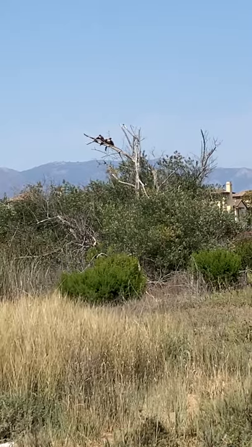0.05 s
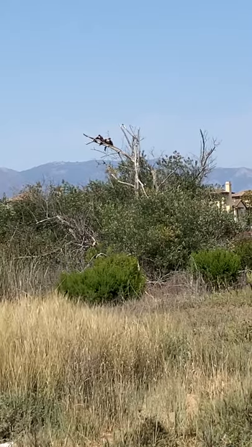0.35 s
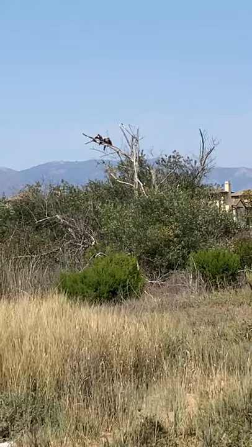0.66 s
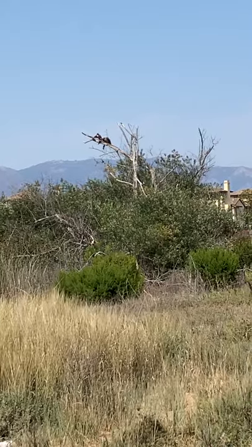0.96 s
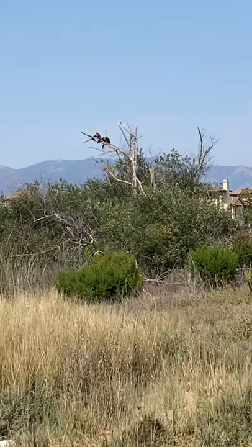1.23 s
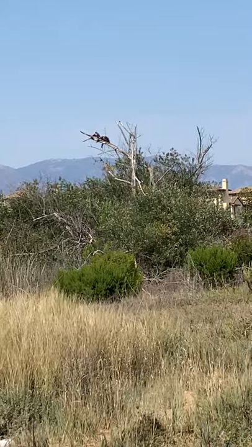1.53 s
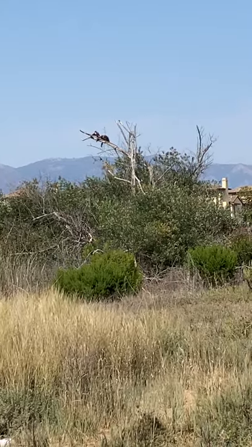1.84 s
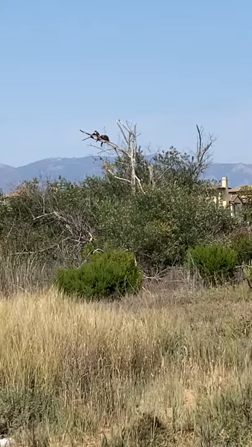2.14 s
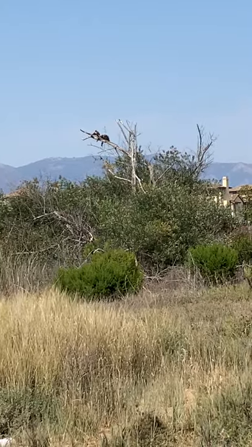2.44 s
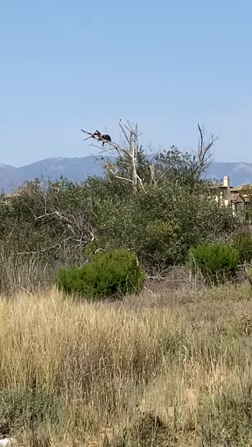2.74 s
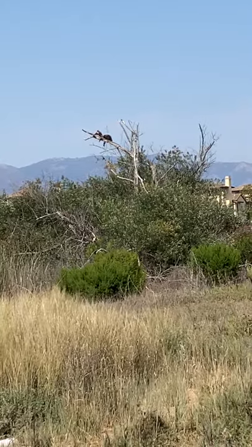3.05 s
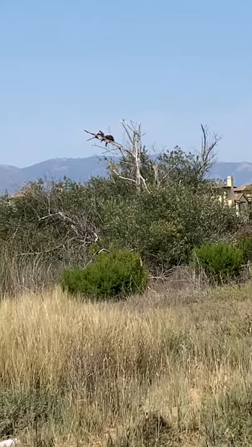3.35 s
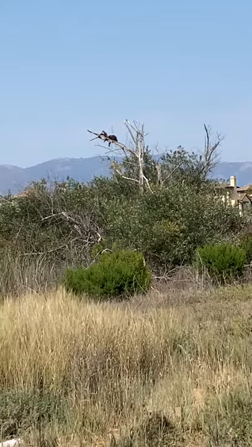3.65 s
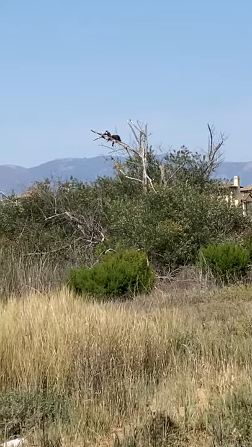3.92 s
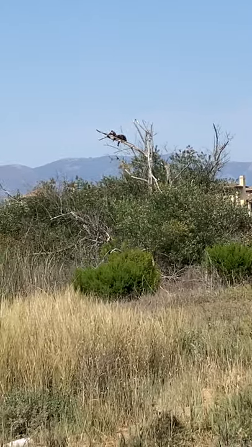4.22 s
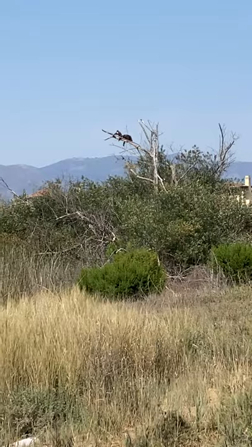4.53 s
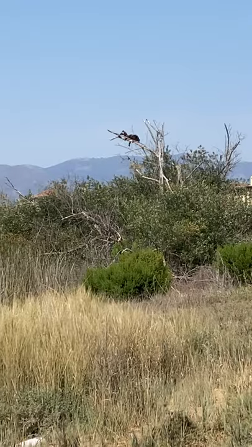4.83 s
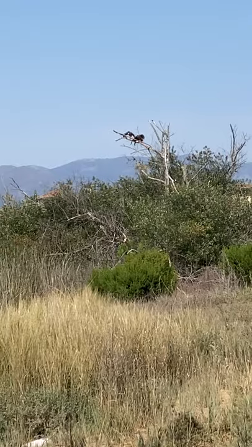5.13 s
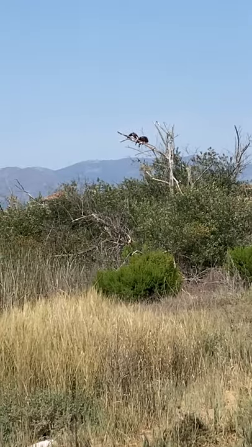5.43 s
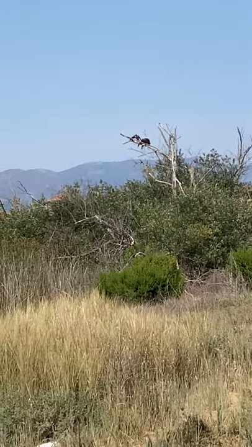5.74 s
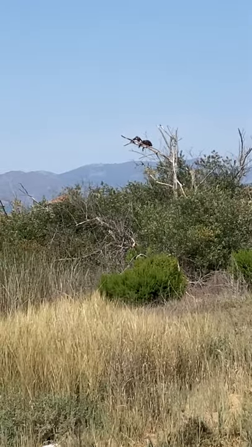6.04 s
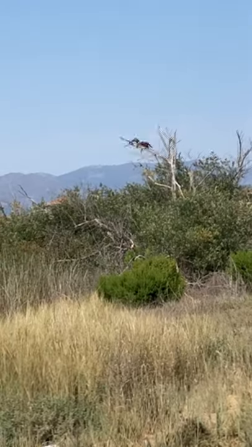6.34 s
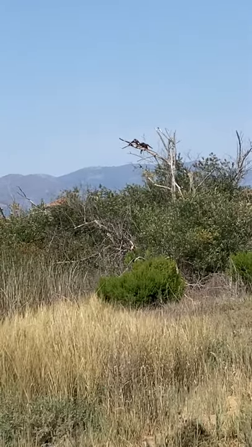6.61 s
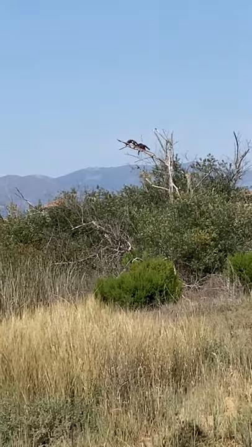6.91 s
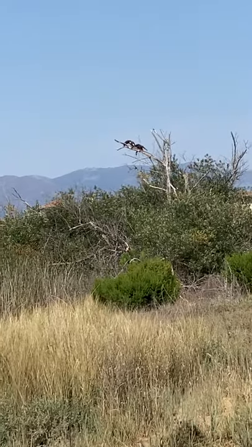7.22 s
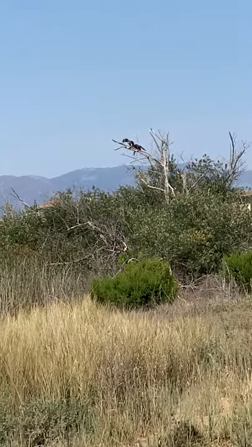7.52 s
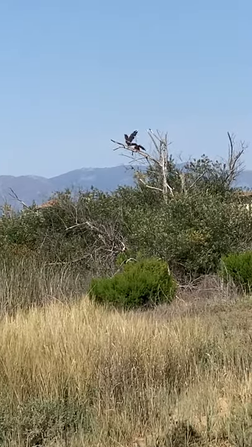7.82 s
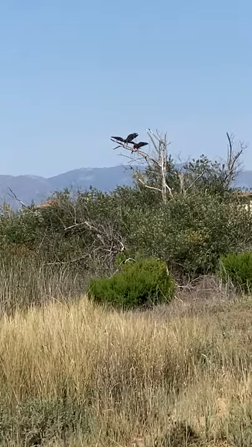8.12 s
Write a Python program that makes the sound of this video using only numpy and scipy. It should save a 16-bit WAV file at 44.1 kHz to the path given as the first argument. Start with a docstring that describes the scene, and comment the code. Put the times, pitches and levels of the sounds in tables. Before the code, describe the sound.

Two hawks trade high whistles, squeals and hoarse yelps over low wind rumble and a distant passing vehicle.

```python
"""Two hawks over open grassland

Two hawks cry from a dead tree. One gives clean rising whistles that drop sharply; the other sounds both
sides of its syrinx in a squeal that breaks into a low, hoarse yelp. Short peeps fall between, and scrub
scatters the cries. Behind them grass hisses, a far vehicle drones past and gusts buffet the microphone."""
import sys
import numpy as np
from scipy import signal
from scipy.fft import rfft, irfft
from scipy.io import wavfile

SR = 44100
rng = np.random.default_rng(int(sys.argv[2]) if len(sys.argv) > 2 else 0)


def file_out(sig):
    """Save sig as 16-bit WAV at sys.argv[1]."""
    # one column per channel
    cols = np.atleast_2d(sig).T
    # limit, then scale
    lim = np.clip(cols, -1, 1)
    pcm = np.round(lim * 32767).astype(np.int16)
    wavfile.write(sys.argv[1], SR, pcm)


N = 360297
T, HZ = np.arange(N) / SR, np.fft.rfftfreq(N, 1 / SR)
SLACK_HZ = 3500  # pitch of the relaxed syrinx


def gain_of(db):
    return 10 ** (np.asarray(db) / 20)


def unit_rms(x):
    return x / np.sqrt(np.mean(x ** 2) + 1e-20)


def over_frequency(table, column=1):
    """Interpolation of one column over the spectrum, on a log-frequency axis."""
    columns = np.transpose(table)
    return np.interp(np.log(HZ + 1), np.log(columns[0] + 1), columns[column])


def over_time(table):
    """Linear interpolation of each column over the scene."""
    times, *columns = np.transpose(table)
    return [np.interp(T, times, column) for column in columns]


def add(mix, start_s, sound):
    part = mix[max(round(start_s * SR), 0):][:len(sound)]
    part += sound[:len(part)]


def wobble(t, hz):
    """Random modulation: noise of rms 1, band-limited to hz."""
    spectrum = rng.standard_normal(1025) + 1j * rng.standard_normal(1025)
    path = unit_rms(irfft(spectrum * (np.arange(1025) < 256)))
    return np.interp((t - t[0]) * hz / 256, np.arange(2048) / 2048, path, period=1)


def coloured_noise(colour):
    """Spectral shaping: white noise weighted by a gain at each frequency."""
    return unit_rms(irfft(rfft(rng.standard_normal(N)) * colour, N))


# Likeness of diffuse sound at the two microphone ports: frequency_hz, coherence
COHERENCE = [(30, 1), (120, 0.94), (300, 0.38), (1000, 0.14), (3000, 0.13), (12000, 0.16)]


def diffuse(colour):
    """Spatial coherence: a diffuse field is alike at both ports only at long wavelengths."""
    left, independent = rfft(rng.standard_normal((2, N)))
    coherence = over_frequency(COHERENCE)
    right = coherence * left + np.sqrt(1 - coherence ** 2) * independent
    return unit_rms(irfft(np.array([left, right]) * colour, N))


# Microphone response toward the tree: frequency_hz, left_lead_rad, left_minus_right_db
PORT_RESPONSE = [(1520, 3.1, -3), (2040, 1.43, -4.5), (2300, 2.5, -0.5), (2744, 1.8, 3.5),
                 (2930, 2.84, -7.5), (4100, 1.48, 1.2), (4550, 1.64, -.5), (4820, 2.08, -4),
                 (5526, 3.18, 2), (8940, 6.29, -1), (15820, 13.15, 1)]


def from_ahead(x):
    """Directional response: sound from the tree meets the two ports at different phases and levels."""
    lead, balance = over_frequency(PORT_RESPONSE), gain_of(over_frequency(PORT_RESPONSE, column=2))
    ports = np.array([balance * np.exp(1j * lead), np.ones(len(HZ))]) * np.sqrt(2 / (1 + balance ** 2))
    return irfft(rfft(x) * ports, N)


# Hiss spectrum of air and dry grass: frequency_hz, relative_db
GRASS_SPECTRUM = [(1000, 5), (6000, -4), (9000, -3.5), (12000, -9.5), (15500, -9.5)]
# Dry ticks close by: start_s, unfiltered_level_db
DRY_TICKS = [(2.795, -52), (7.942, -67)]


def grass(ahead_db=-80, around_db=-88, decay_s=0.003, highpass_hz=5000):
    """Broadband noise: a faint hiss, mostly from ahead, with ticks that decay exponentially."""
    colour = gain_of(over_frequency(GRASS_SPECTRUM))
    hiss = gain_of(ahead_db) * coloured_noise(colour)
    ticks, t = np.zeros(N), np.arange(1024) / SR
    for start_s, db in DRY_TICKS:
        add(ticks, start_s, gain_of(db) * np.exp(-t / decay_s) * rng.standard_normal(len(t)))
    ticks = signal.sosfilt(signal.butter(2, highpass_hz, "high", fs=SR, output="sos"), ticks)
    return from_ahead(hiss + ticks) + gain_of(around_db) * diffuse(colour)


# Tyre roar as the vehicle passes: time_s, level_db
ROAR_LEVEL = [(0, -62.5), (1.3, -68), (3.3, -65), (4.1, -63.5), (4.7, -60.5), (5.3, -60.5), (6.1, -66.5),
              (8.17, -65)]
# Spectrum of the roar: frequency_hz, relative_db
ROAR_SPECTRUM = [(100, -1.5), (330, 2), (500, -0.5), (720, -3), (930, -0.5), (1200, -6.5), (1700, -16),
                 (2400, -28.5), (5000, -47)]


def tyre_roar(fading_db=3.5, scattered_db=-4, left_lead_rad=-1.96):
    """Atmospheric fading: moving air makes each band of the distant roar swell and sink on its own."""
    direct, *scattered = rfft(rng.standard_normal((3, N)))
    ports = np.array([direct * np.exp(1j * left_lead_rad), direct])
    ports += gain_of(scattered_db) * np.array(scattered)
    roar = rfft(unit_rms(irfft(ports * gain_of(over_frequency(ROAR_SPECTRUM)), N)))
    band = np.digitize(HZ, [350, 550, 800, 1050, 1400])
    faded = sum(irfft(roar * (band == k), N) * gain_of(fading_db * wobble(T, 12)) for k in range(6))
    return faded * gain_of(over_time(ROAR_LEVEL)[0]) * gain_of([[-.5], [.5]])


def tyre_song(pitch_hz=930, width_hz=115, nearest_s=4.67, passing_s=.48, db=-68, left_lead_rad=-0.59):
    """Narrowband noise: the tyres sing audibly only while the vehicle is nearest."""
    band = coloured_noise(np.exp(-.5 * ((HZ - pitch_hz) / width_hz) ** 2))
    swell = np.exp(-.5 * ((T - nearest_s) / passing_s) ** 2)
    song = rfft(gain_of(db) * band * swell)
    return irfft(np.array([song * np.exp(1j * left_lead_rad), song]), N)


# The far engine passing: time_s, firing_rate_hz, untrimmed_level_db
ENGINE_PASS = [(0, 79.96, -65), (2.2, 79.82, -67), (2.8, 79, -49.5), (4.3, 76.81, -41), (4.9, 74.97, -38.5),
               (6, 72.22, -54), (8.17, 71.73, -60)]
# Its orders: harmonic_number, relative_db
ENGINE_HARMONICS = [(1, 1), (2, -3.5), (3, -15), (4, -26.5), (5, -28)]


def engine(trim_db=-1, waver=0.0091, fading_db=4.0):
    """Harmonic series: periodic firing gives a drone, whose pitch sags as the vehicle passes."""
    hz, db = over_time(ENGINE_PASS)
    phase = 2 * np.pi * np.cumsum(hz * (1 + waver * wobble(T, 8))) / SR
    drone = sum(gain_of(order_db + fading_db * wobble(T, 6)) * np.sin(k * phase)
                for k, order_db in ENGINE_HARMONICS)
    return gain_of(db + trim_db) * unit_rms(drone)


# Breeze on the microphone: time_s, level_db
BREEZE_LEVEL = [(0, -45.5), (.2, -51), (.8, -49), (.94, -58), (1.05, -49), (1.35, -43), (1.47, -64.5),
                (1.62, -55), (2.05, -46), (2.3, -49), (3.7, -45.5), (4.7, -44.5), (5.5, -43.5), (6.3, -55),
                (6.8, -50.5), (7.45, -47), (7.7, -49.5), (8.17, -46)]
# Spectrum of its rumble: frequency_hz, relative_db
BREEZE_SPECTRUM = [(12, -50.5), (20, -27.5), (34, -9.5), (59, -3), (81, -2), (113, -8.5), (157, -7),
                   (247, -20), (293, -28), (450, -43), (580, -65.5), (990, -120)]


def breeze(uneven_db=2, lean_db=0.63):
    """Wind noise: unsteady flow over the ports gives a lumpy rumble, slightly stronger on the left."""
    db = over_time(BREEZE_LEVEL)[0] + uneven_db * wobble(T, 13)
    rumble = diffuse(gain_of(over_frequency(BREEZE_SPECTRUM)))
    return rumble * gain_of(db) * gain_of([[lean_db], [-lean_db]])


# Eddies on the microphone: centre_s, level_db, half_length_s, upper_corner_hz, left_minus_right_db
EDDIES = [(0.512, -36.5, 0.017, 165, -6), (.54, -38.5, 0.0039, 250, -15), (.565, -31.5, 0.013, 112, -5.5),
          (1.238, -29, 0.017, 116, -11.5), (2.957, -30, 0.027, 107, 1), (3.015, -30, 0.024, 110, 0),
          (5.314, -24, 0.027, 107, 0), (5.384, -32.5, .025, 107, 1), (5.612, -32, 0.009, 140, -10),
          (6.275, -35, 0.03, 123, 8.5), (6.366, -33, 0.032, 110, 0.5), (7.037, -36.5, 0.0083, 159, -15),
          (7.117, -28.5, 0.0057, 210, -14), (7.144, -32, 0.026, 103, -10)]


def gusts(low_hz=46, rolloff_order=4.05, size=16384):
    """Turbulence: each eddy is a low thump, partly shared by the ports and often harder on one."""
    out = np.zeros((2, N))
    hz, t = np.fft.rfftfreq(size, 1 / SR), (np.arange(size) - size // 2) / SR
    highpass = (hz / low_hz) ** 4 / (1 + (hz / low_hz) ** 4)
    for centre_s, db, half_s, corner_hz, pan_db in EDDIES:
        colour = highpass / (1 + (hz / corner_hz) ** rolloff_order)
        shared, *swirls = irfft(rfft(rng.standard_normal((3, size))) * colour)
        swell = np.exp(-.5 * (t / half_s) ** 2)
        for port, swirl, side in zip(out, swirls, (.5, -.5)):
            eddy = unit_rms((shared + 0.93 * swirl) * swell) * np.sqrt(np.mean(swell ** 2))
            add(port, centre_s + t[0], gain_of(db + side * pan_db) * eddy)
    return out


def oscillation(t, hz, db, jitter, jitter_hz, fade_s):
    """Frequency jitter: the phase of a trembling voice, and its amplitude, faded at both ends."""
    phase = 2 * np.pi * np.cumsum(hz * (1 + jitter * wobble(t, jitter_hz))) / SR
    fade = np.clip(np.minimum(t, t[-1] - t) / fade_s, 0, 1)
    return phase, np.sqrt(2) * gain_of(db) * fade


def rasp(t, phase, width_hz):
    """Noise sidebands: irregular vibration spreads a tone into a fuzzy band."""
    return (wobble(t, width_hz) * np.cos(phase) + wobble(t, width_hz) * np.sin(phase)) / np.sqrt(2)


def rise(t, low_hz, top_hz, lift_s, ease_s):
    """Tension raises a membrane's frequency: returns the pitch, and the lift from 0 to 1."""
    lift = .5 + .5 * np.tanh((t - lift_s) / (2 * ease_s))
    return low_hz + (top_hz - low_hz) * lift, lift


def pure_voice(t, hz, db, octave_db, fuzz_db=-34, flutter_db=2.0):
    """Nearly sinusoidal vibration: one membrane sings a tone with weak second and third harmonics."""
    phase, level = oscillation(t, hz, db, jitter=0.0028, jitter_hz=137, fade_s=0.0065)
    tone = np.sin(phase) + gain_of(octave_db) * (np.sin(2 * phase) + gain_of(-28) * np.sin(3 * phase))
    flutter = gain_of(flutter_db * wobble(t, 69))
    return level * flutter * (tone + gain_of(fuzz_db) * rasp(t, phase, 1200))


# Short notes between cries: start_s, length_s, top_after_s, top_hz, end_hz, top_db, end_db, octave_db
PEEP_NOTES = [(1.21, 0.064, 0.012, 3520, 3260, -76, -77, -19),
              (1.245, 0.068, .022, 3940, 2940, -71.5, -85, -28),
              (3.735, 0.083, 0.035, 4020, 3840, -76, -73, -24),
              (4.54, 0.071, 0.037, 4190, 3800, -80, -79, -22),
              (4.735, .18, 0.11, 4440, 4040, -61, -60.5, -11),
              (6.14, 0.087, 0.049, 4390, 3780, -75.5, -81, -24),
              (7.83, 0.14, .042, 4820, 3430, -52.5, -68.5, -7.5),
              (7.975, .12, 0.071, 5330, 3350, -47, -68, -16),
              (8.13, 0.11, 0.067, 5100, 3500, -65, -75, -28)]


def peep(length_s, top_after_s, top_hz, end_hz, top_db, end_db, octave_db, onset_db=-15):
    """Frequency glide: the pitch arches up from the relaxed syrinx, then eases down."""
    t = np.arange(0, length_s, 1 / SR)
    slack = np.clip(1 - t / top_after_s, 0, 1) ** 2.3
    fall = np.sin(np.pi / 2 * np.clip((t - top_after_s) / (length_s - top_after_s), 0, 1)) ** 2
    hz = top_hz + (SLACK_HZ - top_hz) * slack + (end_hz - top_hz) * fall
    return pure_voice(t, hz, top_db + onset_db * slack + (end_db - top_db) * fall, octave_db)


# Low, hoarse calls: start_s, length_s, top_hz, arch_fraction, level_db, overtones_db, rough_db
YELP_NOTES = [(.905, .058, 1783, 0.21, -53, -13, -11), (1.65, 0.077, 2050, 0.23, -59.5, -15, -14),
              (2.472, 0.057, 2073, 0.27, -53.5, -9, -12.5), (3.33, 0.076, 2063, 0.18, -49, -17.5, -17),
              (4.196, .084, 2060, .15, -51.5, -9, -16), (5.025, .08, 2017, .24, -59, 2.5, -5.5),
              (5.567, 0.039, 1913, 0.1, -60, 5.5, -9.5), (5.768, .074, 2129, .15, -51.5, -3, -24),
              (6.595, .075, 1957, 0.04, -59, 1, -23), (7.845, 0.059, 2750, 0.4, -52, -12, -23),
              (7.885, 0.019, 1863, 0.43, -45, -16, -26)]
# Their overtones: harmonic_number, relative_db
YELP_HARMONICS = [(2, -1.5), (3, -4), (4, -20.5), (5, -25.5)]


def yelp(length_s, top_hz, arch, level_db, overtones_db, rough_db, flutter_db=1.5, attack_s=0.0083):
    """Register break: the voice drops to a low arch of harmonics, half-order lines and hoarse noise."""
    t = np.arange(0, length_s, 1 / SR)
    slack = abs(2 * (t / length_s) ** 1.25 - 1) ** 2.6  # 1 at the ends, 0 at the top of the arch
    hz = top_hz * (1 - arch * slack + .015 * wobble(t, 68.2))
    db = level_db - 12 * slack - 11 * np.exp(-t / attack_s)
    phase, level = oscillation(t, hz, db, jitter=0.0094, jitter_hz=310, fade_s=0.0015)
    overtones = sum(gain_of(line_db + flutter_db * wobble(t, 100)) * np.sin(k * phase)
                    for k, line_db in YELP_HARMONICS)
    half_orders = sum(rasp(t, (k + .5) * phase, 120) / k ** 2.5 for k in range(1, 5))
    hoarse = 1.03 * rasp(t, 1.45 * phase, 1100) + rasp(t, 2.9 * phase, 2400)
    rough = gain_of(rough_db) * (half_orders + gain_of(-3) * hoarse)
    flutter = gain_of(flutter_db * wobble(t, 150))
    return level * flutter * (np.sin(phase) + gain_of(overtones_db) * overtones + rough)


def two_voices(t, hz, db, ratio, second_db, clear_db, break_s, flutter_db=3, firm_db=-56):
    """Biphonation: both sides of the syrinx sing, couple into a side tone, then collapse into a rasp."""
    phase, level = oscillation(t, hz, db, jitter=.006, jitter_hz=87.7, fade_s=0.0033)
    wheeze_db = .5 * np.maximum(firm_db - db, 0)  # a weak voice wheezes more
    second_phase = ratio * phase + 0.78 * wobble(t, 70)
    first = np.sin(phase) * gain_of(flutter_db * wobble(t, 70))
    first += gain_of(wheeze_db - 20) * rasp(t, phase, 1000)
    second = np.sin(second_phase) * gain_of(clear_db + flutter_db * wobble(t, 70))
    second += gain_of(wheeze_db / 2 - 12) * rasp(t, second_phase, 1900)
    second += gain_of(clear_db - 31) * np.sin(2 * second_phase)
    side_tone = gain_of(-15) * rasp(t, 2 * second_phase - phase, 220)
    voiced = first + gain_of(second_db) * (second + side_tone)
    broken = np.clip((t - break_s) / 0.0071, 0, 1)
    collapse = gain_of(-3) * (rasp(t, phase, 300) + rasp(t, phase, 1400))
    return level * ((1 - broken) * voiced + broken * collapse)


# Two-voiced cries: start_s, length_s, low_hz, top_hz, lift_s, ease_s, peak_s, start_db, peak_db, end_db,
# second_voice_pitch_ratio, second_voice_relative_db, closing_rasp_s
SQUEAL_NOTES = [(.51, 0.17, 4270, 4310, 0.074, .02, 0.16, -87, -74, -77, 1.215, -16.5, .01),
                (.55, 0.34, 4900, 6180, 0.16, .09, 0.27, -80, -59, -62, 0.67, -28, 0.011),
                (1.325, .345, 4910, 5260, .16, 0.018, 0.27, -81, -62, -64.5, 1.13, -12, 0.037),
                (2.005, .435, 4450, 5940, .125, .038, 0.18, -69, -65.5, -65, 1.172, -5.5, .03),
                (2.85, 0.29, 4365, 5660, 0.093, 0.024, 0.14, -65, -55.5, -73, 1.25, -11.5, 0.035),
                (3.08, 0.25, 5450, 6150, 0.14, 0.036, .11, -70, -60, -70.5, 1.175, -5.5, .035),
                (3.82, .38, 4000, 6330, 0.16, 0.092, .33, -75.5, -65.5, -75, 1.135, -8, .04),
                (4.615, 0.44, 4240, 6090, 0.13, 0.095, 0.26, -86, -59, -61, 1.145, -6, 0.036),
                (5.315, 0.45, 4550, 6546, .126, 0.056, 0.16, -70, -42.5, -65.5, 1.193, -8.5, .055),
                (6.225, 0.34, 4550, 6430, 0.15, 0.041, 0.047, -79, -68, -70.5, 1.165, -3, 0.054),
                (7.04, 0.076, 6300, 5900, .03, .02, 0.041, -83.5, -68, -78, 1.2, -16, 0.026),
                (7.47, 0.4, 3910, 6840, 0.079, 0.076, 0.36, -74.5, -57.5, -73, 1.14, -1, 0.039)]


def squeal(length_s, low_hz, top_hz, lift_s, ease_s, peak_s, start_db, peak_db, end_db,
           ratio, second_db, rasp_s, scoop_s=0.018, sag_s=.07, step_hz=500, catch=0.68):
    """Stepped glide: the pitch climbs and sags while the second voice clears from a hiss to a tone."""
    t = np.arange(0, length_s, 1 / SR)
    hz, lift = rise(t, low_hz, top_hz, lift_s, ease_s)
    hz += 0.35 * (SLACK_HZ - hz) * np.exp(-t / scoop_s)
    hz *= 1 - .07 * np.clip(1 + (t - length_s) / sag_s, 0, 1) ** 3
    hz -= catch * step_hz / (2 * np.pi) * np.sin(2 * np.pi * (hz - top_hz) / step_hz)  # lingers on steps
    db = np.interp(t, [0, peak_s, length_s], [start_db, peak_db, end_db]) + 2 * wobble(t, 24.34)
    clear_db = -16 * (1 - lift) ** 2
    return two_voices(t, hz, db, ratio, second_db, clear_db, break_s=length_s - rasp_s)


# Clean cries: start_s, length_s, start_hz, low_hz, top_hz, lift_s, ease_s, low_db, top_db, octave_db
WHISTLE_NOTES = [(.64, .275, 3700, 4040, 4696, 0.097, 0.034, -70.5, -61, -19),
                 (1.645, 0.3, 3700, 4436, 5790, 0.13, 0.024, -64.5, -48, -13),
                 (2.22, 0.3, 3500, 4160, 6120, 0.12, 0.05, -67, -44, -13.5),
                 (2.77, 0.25, 3550, 4750, 5770, 0.13, 0.019, -50.5, -47, -14),
                 (4.908, .27, 4075, 4100, 6185, .072, .034, -58, -43, -17.5),
                 (5.345, .23, 3400, 4970, 6330, .142, .045, -52, -51, -13)]


def whistle(length_s, start_hz, low_hz, top_hz, lift_s, ease_s, low_db, top_db, octave_db,
            scoop_s=.015, drop_s=.038, onset_db_per_khz=-17, purer_db=12):
    """Tension glide: the tone scoops up, grows louder and purer, then drops as the syrinx relaxes."""
    t = np.arange(0, length_s, 1 / SR)
    hz, lift = rise(t, low_hz, top_hz, lift_s, ease_s)
    scoop_hz = (hz - start_hz) * np.exp(-t / scoop_s)
    drop = np.clip(1 + (t - length_s) / drop_s, 0, 1) ** 3
    hz = SLACK_HZ + (hz - scoop_hz - SLACK_HZ) * (1 - drop)
    db = low_db + (top_db - low_db) * lift + onset_db_per_khz * scoop_hz / 1000
    db += 2 * np.sin(np.pi * np.sqrt(drop)) - 12 * drop ** 2  # a last push, then the fade
    db += 1.5 * wobble(t, 29.9)
    return pure_voice(t, hz, db, octave_db + purer_db * (.5 - lift * (1 - drop)))


def play(notes, voice):
    """Superposition of notes, each sung at its start time."""
    out = np.zeros(N)
    for start_s, *settings in notes:
        add(out, start_s, voice(*settings))
    return out


def scrub(x, near_db, far_db, near_t60_s=0.14, far_t60_s=0.86, echoes_per_s=3000):
    """Scattering: bushes by the tree return a short tail, the land beyond a long faint one."""
    t = np.arange(SR) / SR
    echoes = rng.standard_normal((2, SR)) * (rng.random((2, SR)) < echoes_per_s / SR) * (t > .004)
    tails = echoes * gain_of(-60 * t / np.array([[near_t60_s], [far_t60_s]]))
    tails /= np.linalg.norm(tails, axis=1, keepdims=True)
    return x + signal.fftconvolve(x, gain_of([near_db, far_db]) @ tails)[:N]


def hawks():
    """Direct and scattered sound: the rough cries return from the scrub most strongly."""
    pure = scrub(play(WHISTLE_NOTES, whistle) + play(PEEP_NOTES, peep), near_db=-13, far_db=-29)
    squeals = scrub(play(SQUEAL_NOTES, squeal), near_db=-10.5, far_db=-25)
    yelps = scrub(play(YELP_NOTES, yelp), near_db=-9, far_db=-29)
    return from_ahead(pure + squeals + yelps)


def scene():
    """Superposition: the pressures of all sources add at the microphone."""
    return hawks() + breeze() + gusts() + engine() + tyre_roar() + tyre_song() + grass()


def record(dry, cutoff_hz=15700):
    """Band limiting: a steep low-pass filter removes the highest treble."""
    lowpass = signal.firwin(511, cutoff_hz, window=("kaiser", 9), fs=SR)
    return signal.oaconvolve(dry, lowpass[None], "same")


dry = scene()
out = record(dry)
file_out(out)
```